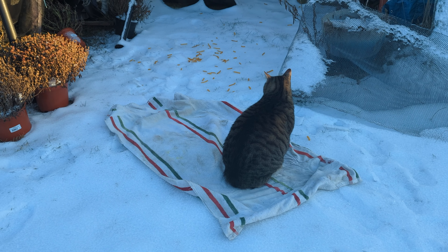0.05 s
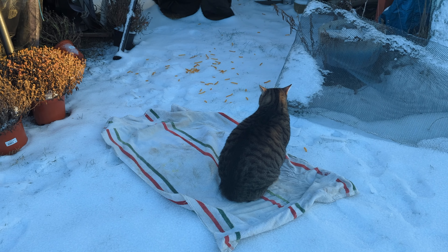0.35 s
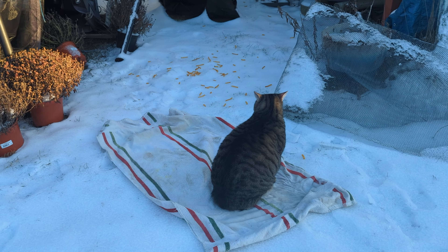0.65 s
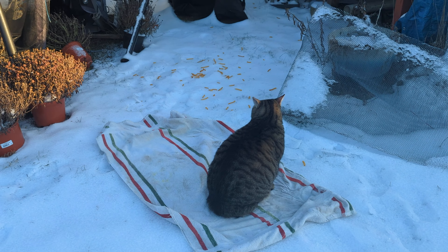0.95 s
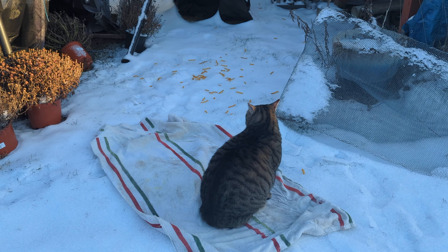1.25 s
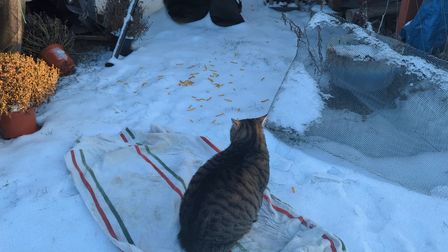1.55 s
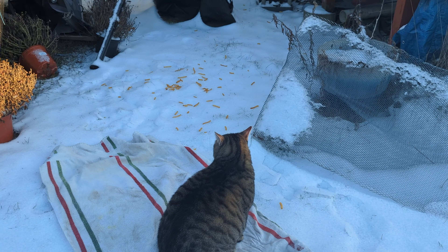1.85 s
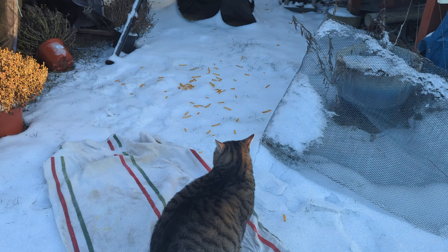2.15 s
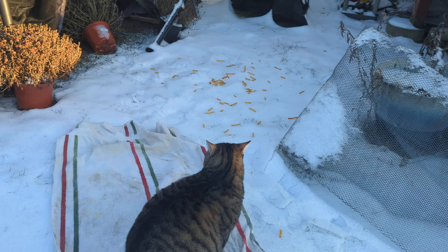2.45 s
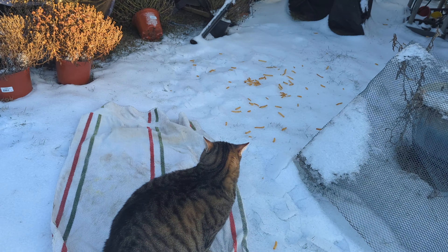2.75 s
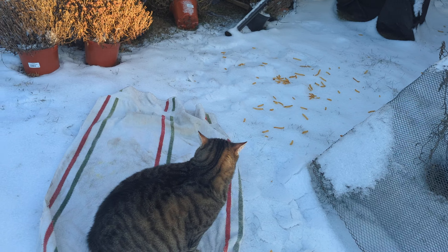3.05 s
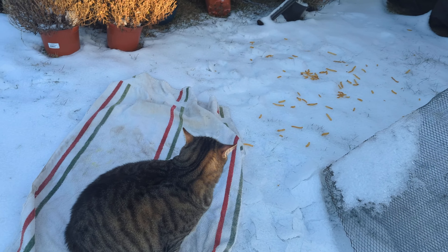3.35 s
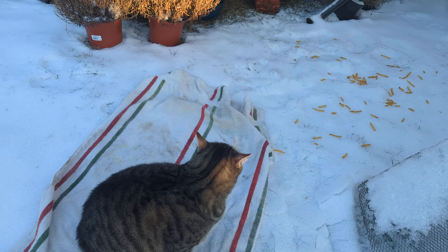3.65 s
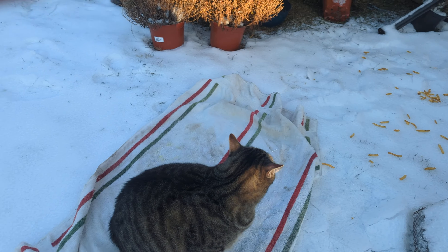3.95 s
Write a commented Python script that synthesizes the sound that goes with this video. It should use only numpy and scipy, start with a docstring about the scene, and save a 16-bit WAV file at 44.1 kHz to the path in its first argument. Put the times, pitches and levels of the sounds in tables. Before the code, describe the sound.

Footsteps press slowly into frozen snow outdoors, each a gritty crunch with small brittle cracks and a few soft thuds. The walker's handheld phone also picks up a faint low rumble and, at the end, a brush of fabric.

```python
"""Slow steps on crusted snow in a yard, heard from a phone in the walker's hand.
A low rumble, faint outdoor air and a soft rustle are there from the start. Loose grains trickle, the icy
crust snaps in single brittle fractures, the sole thuds, and early on the phone jolts in the hand.
As the weight comes down, the snow beneath crunches: many tiny grains break in jerks.
Near the end the rustle of clothing swells and the fabric gives a brighter brush."""
import sys
import numpy as np
from scipy import signal
from scipy.fft import rfft, irfft
from scipy.io import wavfile
from scipy.ndimage import map_coordinates

SR = 44100
rng = np.random.default_rng(int(sys.argv[2]) if len(sys.argv) > 2 else 0)


def pcm_store(signal):
    """Save signal as 16-bit PCM."""
    levels = np.round(np.clip(np.atleast_2d(signal), -1, 1) * 32767)
    wavfile.write(sys.argv[1], SR, levels.astype(np.int16).T)


N = 176400


def undb(db):
    """Amplitude ratio: tenfold for every 20 dB."""
    return 10 ** (np.asarray(db) / 20)


def envelope(rows):
    """Linear interpolation of a level in dB over time, silent outside the rows."""
    times, db = np.array(rows).T
    return np.interp(np.arange(N) / SR, times, db, left=-120, right=-120)


def unit(x):
    """Normalisation to rms 1."""
    return x / np.sqrt(np.mean(x ** 2))


def spectrum_db(points, hz):
    """Interpolation of a spectrum on a log-frequency axis."""
    f, db = np.array(points).T
    return np.interp(np.log(hz + 1), np.log(f), db)


def colour(x, points):
    """Minimum-phase filtering: folding the cepstrum makes the given spectrum causal."""
    n = len(x)
    gain = undb(spectrum_db(points, np.fft.rfftfreq(n, 1 / SR)))
    cepstrum = irfft(np.log(gain), n)
    cepstrum[1:n // 2] *= 2
    cepstrum[n // 2 + 1:] = 0
    return irfft(rfft(x) * np.exp(rfft(cepstrum)), n)


def noise(points):
    """Spectrally shaped Gaussian noise of rms 1."""
    return unit(colour(rng.standard_normal(N), points))


def wander(hz):
    """Random modulation: straight lines between Gaussian values, spread near 1."""
    return 1.2 * np.interp(np.arange(N) * hz / SR, np.arange(N), rng.standard_normal(N))


def grains(per_s, spread_db):
    """Poisson impulses: a few stand out as stronger, or as weaker if the spread is negative."""
    size = undb(spread_db * np.minimum(rng.exponential(size=N), 4))
    occurs = rng.random(N) < per_s / SR
    return unit(occurs * size * rng.choice([-1, 1], N))


def add(track, start_s, sound):
    """Superposition of a short sound on a track."""
    i = max(int(start_s * SR), 0)
    track[i:i + len(sound)] += sound[:max(N - i, 0)]


# Spectra of the rumble and the outdoor air. Each row: frequency in Hz, relative density in dB.
RUMBLE_SPECTRUM = [(12, -8), (22, 1), (48, -6), (60, -6.5), (71, -4), (90, -14), (130, -27), (220, -47),
                   (600, -74.5)]
AIR_SPECTRUM = [(130, -0.5), (300, -4.5), (700, -15), (1200, -40), (3000, -39), (9000, -52), (13000, -74)]
# Drift of the rumble. Each row: time in seconds, level in dB.
RUMBLE_ENVELOPE = [(0, -39.5), (1.8, -44), (3.3, -42), (4, -44.5)]
BUFFETING, AIR_DB = (1.6, 0.88), -56.5  # left and right port's own rumble, relative to the shared part


def background():
    """Partial coherence: both microphone ports share rumble and air, and each adds noise of its own."""
    shared, air = noise(RUMBLE_SPECTRUM), noise(AIR_SPECTRUM)
    rumble = np.array([unit(shared + own * noise(RUMBLE_SPECTRUM)) * (1 + own) for own in BUFFETING])
    rumble *= undb(envelope(RUMBLE_ENVELOPE)) / (1 + np.mean(BUFFETING))
    outdoors = np.array([air + 0.17 * noise(AIR_SPECTRUM) for _ in range(2)])
    return rumble + undb(AIR_DB) * outdoors


# Swell of the dull rustle. Each row: time in seconds, level in dB.
RUSTLE_ENVELOPE = [(0, -68.5), (1, -67), (2.1, -67.5), (2.9, -72), (3.4, -61.5), (3.75, -56), (4, -51.5)]
# Its spectrum. Each row: frequency in Hz, relative density in dB.
RUSTLE_SPECTRUM = [(300, 0), (900, -2), (1500, -9.5), (4500, -22), (16000, -70)]


def clothing_rustle():
    """Friction noise: clothing rubs softly, with a fluttering level, as the walker turns."""
    flutter_db = 3.4 * wander(hz=84)
    return undb(envelope(RUSTLE_ENVELOPE) + flutter_db) * noise(RUSTLE_SPECTRUM)


# Flow of loose grains. Each row: time in seconds, level in dB.
TRICKLE_ENVELOPE = [(.2, -72.5), (.32, -58), (.39, -76), (1.08, -60), (1.17, -63.5), (1.22, -78),
                    (2.29, -77.5), (2.75, -67), (2.95, -70), (3.55, -58.5), (3.78, -77)]
# Its spectrum. Each row: frequency in Hz, relative density in dB.
TRICKLE_SPECTRUM = [(800, 10), (3000, -3.5), (5800, -5), (8300, 1.5), (11000, -9.5), (13000, -23),
                    (16000, -37.5)]


def trickle():
    """Shot noise: the tiny impacts of ice grains sliding and settling merge into a fine hiss."""
    impacts = grains(per_s=8400, spread_db=3.0)
    return undb(envelope(TRICKLE_ENVELOPE)) * unit(colour(impacts, TRICKLE_SPECTRUM))


# Fractures of the crust. Each row: start in seconds, relative level of body and plate in dB,
# pitch of the broken plate in Hz, relative level of the snap in dB.
CRUST_CRACKS = [(0.226, -27, 1570, -42), (0.422, -26.5, 730, -39.5), (0.497, -30, 784, -40),
                (0.545, -25.5, 667, -42.5), (0.562, -17.5, 590, -33), (0.638, -28, 1090, -52),
                (0.676, -31, 630, -41.5), (0.684, -34, 497, -42.5), (0.71, -26.5, 770, -42),
                (0.796, -17, 886, -37), (0.807, -21.5, 1020, -50), (0.897, -25.5, 950, -36.5),
                (1.035, -28, 1620, -48), (1.174, -31.5, 805, -48), (1.23, -42, 536, -56),
                (1.27, -36, 654, -48.5), (1.314, -36, 600, -38), (1.367, -38.5, 880, -47),
                (1.392, -20, 676, -30.5), (1.446, -14.5, 750, -23.5), (1.462, -12.5, 1570, -30),
                (1.4812, -19.5, 950, -29.5), (1.487, -20, 836, -31), (1.505, -15, 690, -25),
                (1.688, -29, 710, -42), (1.715, -29, 637, -42), (1.753, -32.5, 790, -45.5),
                (1.843, -42, 534, -58.5), (1.968, -41, 765, -56), (2.009, -40, 1900, -57),
                (2.039, -46.5, 835, -56.5), (2.137, -34.5, 600, -40.5), (2.302, -40, 925, -45),
                (2.355, -28.5, 1150, -38), (2.378, -35, 534, -30), (2.533, -25, 880, -39.5),
                (2.5946, -12.5, 920, -25.5), (2.598, -17.5, 940, -39), (2.659, -24, 920, -41),
                (2.697, -28, 1080, -63), (2.98, -30.5, 1540, -43), (3.083, -28, 1440, -34.5),
                (3.325, -31, 1560, -34), (3.488, -26.5, 1790, -40.5), (3.549, -45, 1040, -39.5),
                (3.881, -33, 1430, -32.5), (3.93, -27, 1480, -33), (3.967, -34, 1530, -38)]
# Spectra of the bright snap and the dull body. Each row: frequency in Hz, relative density in dB.
SNAP_SPECTRUM = [(500, -11), (1500, 1), (3300, 3.5), (6300, -0.5), (8200, 0.5), (11000, -11.5),
                 (16000, -28)]
BODY_SPECTRUM = [(80, -15), (220, -9), (500, 3.5), (1600, 3), (2600, -21), (6000, -41)]
SNAP_DB, BODY_DB, PLATE_DB = 1.5, -10.5, 2
CRACK_RISE_S, BODY_LAG_S, PLATE_DECAY_CYCLES = 0.00088, 0.000846, 1.5


def crust_cracks():
    """Brittle fracture: a bright snap, then a dull burst and the heavily damped knock of the plate."""
    out, t = np.zeros(N), np.arange(2048) / SR
    rise = np.minimum(t / CRACK_RISE_S, 1) ** 2

    def burst(spectrum, decay_s):
        """Exponentially decaying spiky noise, its energy proportional to the decay time."""
        fractures = rng.standard_normal(len(t)) * rng.random(len(t)) ** 2
        x = colour(fractures * rise * np.exp(-t / decay_s), spectrum)
        return x * np.sqrt(decay_s * SR / np.sum(x ** 2))

    for start, body_db, hz, snap_db in CRUST_CRACKS:
        snap = undb(SNAP_DB) * burst(SNAP_SPECTRUM, decay_s=0.0024)
        body = undb(BODY_DB) * burst(BODY_SPECTRUM, decay_s=0.0027)
        plate = rise * np.sin(2 * np.pi * hz * t) * np.exp(-t * hz / PLATE_DECAY_CYCLES)
        add(out, start, undb(snap_db) * snap)
        add(out, start + BODY_LAG_S, undb(body_db) * (body - undb(PLATE_DB) * plate))
    return out


# Landings of the sole. Each row: start in seconds, level in dB.
SOLE_THUDS = [(0.23, -31), (0.424, -38), (0.507, -33), (0.564, -24.5), (1.392, -34), (2.98, -34.5),
              (3.087, -29.5), (3.169, -32)]
THUD_HZ, THUD_DECAY_S = 301, 0.0025


def sole_thuds():
    """Damped oscillation: the sole strikes packed snow with a hollow thump, its pitch varying by chance."""
    out, t = np.zeros(N), np.arange(SR // 10) / SR
    for start, db in SOLE_THUDS:
        hz = THUD_HZ * np.exp(0.14 * rng.standard_normal())
        add(out, start, undb(db) * np.sin(2 * np.pi * hz * t) * np.exp(-t / THUD_DECAY_S))
    return out


# Jolts of the phone. Each row: start in seconds, peak of the envelope in dB.
HANDLING_BUMPS = [(0.242, -36), (.45, -34), (0.519, -38), (0.889, -35.5), (1.099, -32.5)]
BUMP_HZ, BUMP_LENGTH_S = 36.3, 0.094


def handling_bumps():
    """Structure-borne sound: each jolt in the hand gives the phone a few very low swings."""
    out, t = np.zeros(N), np.arange(int(BUMP_LENGTH_S * SR)) / SR
    for start, db in HANDLING_BUMPS:
        swing = np.sin(2 * np.pi * (BUMP_HZ * t + rng.random()))
        add(out, start, undb(db) * np.hanning(len(t)) * swing)
    return out


# Weight on the snow, one list per step. Each row: time in seconds, relative crunch level in dB.
STEP_LOADS = [
    [(.42, -49.5), (.46, -57.5), (.495, -52.5), (.508, -34.5), (.54, -52.5), (.57, -41), (.635, -47),
     (.67, -59), (.72, -53), (.785, -67)],
    [(.794, -62), (.803, -40), (.825, -57), (.87, -69), (.88, -36.5), (.903, -40), (.918, -49),
     (.995, -64.5), (1.035, -56), (1.07, -100)],
    [(1.32, -70), (1.44, -55), (1.456, -29), (1.475, -39), (1.503, -38), (1.511, -34.5), (1.54, -42),
     (1.57, -41), (1.645, -45), (1.657, -37.5), (1.678, -60.5), (1.695, -47.5), (1.78, -66)],
    [(2.34, -49), (2.372, -47.5), (2.4, -32.5), (2.44, -35), (2.48, -37), (2.55, -46), (2.62, -45.5),
     (2.685, -50.5), (2.73, -60.5)],
    [(2.98, -44.5), (3.02, -66.5), (3.045, -48), (3.075, -70), (3.09, -41.5), (3.155, -70)],
    [(3.16, -68), (3.172, -38), (3.185, -48), (3.225, -37), (3.31, -47.5), (3.425, -39.5), (3.48, -51.5),
     (3.54, -65), (3.56, -43), (3.58, -93)],
]
# Brightness of the steps. Each entry: one step's spectral tilt about 1 kHz in dB per octave.
STEP_TILTS = [-0.18, 0.68, 0.12, -0.29, 0.0099, -0.25]
# Spectrum of crunching snow. Each row: frequency in Hz, relative density in dB.
SNOW_SPECTRUM = [(100, -16), (250, -7.5), (430, -2.5), (660, 1.5), (1000, -2), (1700, -3.5), (3000, -9.5),
                 (8700, -11.5), (11000, -20), (16000, -42)]
SLIPS_PER_S, SLIP_DB, SLIP_DECAY_S = 260, -3.5, 0.00091
CRUNCH_DB = 2


def snow_crunch():
    """Stick-slip failure: grains break in jerks under the boot, small bright ones outnumbering large."""
    loads = [undb(envelope(step)) for step in STEP_LOADS]
    slips = np.abs(grains(SLIPS_PER_S, spread_db=-3.0))
    slips = unit(signal.lfilter([1], [1, -np.exp(-1 / (SLIP_DECAY_S * SR))], slips))
    jerks = unit(1 + undb(SLIP_DB) * slips)
    crunch = np.zeros(N)
    for hz in 125 * 2 ** np.arange(0, 7.5, .5):  # half-octave bands
        band = signal.butter(2, [hz / 2 ** .25, hz * 2 ** .25], "band", fs=SR, output="sos")
        weight = sum(load * undb(tilt * np.log2(hz / 1000)) for load, tilt in zip(loads, STEP_TILTS))
        fractures = grains(per_s=hz, spread_db=2.5)  # one grain per cycle on average
        crunch += signal.sosfilt(band, weight * jerks * fractures)
    power_gain = np.mean(undb(spectrum_db(SNOW_SPECTRUM, np.arange(SR / 2))) ** 2)
    return undb(CRUNCH_DB) * colour(crunch, SNOW_SPECTRUM) / np.sqrt(power_gain)


# The closing brush of fabric. Each row: time in seconds, level in dB.
BRUSH_ENVELOPE = [(3.815, -83), (3.83, -48), (3.865, -48), (3.9, -56.5), (3.95, -54), (4, -52)]
# Its spectrum. Each row: frequency in Hz, relative density in dB.
BRUSH_SPECTRUM = [(300, -35.5), (1200, 6), (2400, 6), (5000, -1.5), (8500, 5.5), (11000, -8.5),
                  (16000, -28)]


def clothing_brush():
    """Sliding friction: dense tiny impulses make one bright brush of fabric."""
    impulses = grains(per_s=8300, spread_db=2.5)
    return undb(envelope(BRUSH_ENVELOPE)) * unit(colour(impulses, BRUSH_SPECTRUM))


# Level difference between the ports. Each row: frequency in Hz, left minus right in dB.
PORT_DIFFERENCE = [(100, -4.5), (700, 0.5), (1300, -1.5), (2400, 0.7), (4400, -1.5), (8200, 4.5),
                   (13000, -1.5)]
TURN_S, LEFT_LAG_S = (2.0, 2.8), (45e-6, 12e-6)  # at the start and end of the phone's turn
SCATTER_DB, SCATTER_ABOVE_HZ = -1.5, 5470
YARD_DB, YARD_T60_S = -14, 0.072


def microphone_ports(x):
    """Path difference: the right port hears first; scattered treble and yard reverberation follow."""
    t, hz = np.arange(SR // 2) / SR, np.fft.rfftfreq(N, 1 / SR)
    treble = signal.sosfilt(signal.butter(1, SCATTER_ABOVE_HZ, "high", fs=SR, output="sos"), x)
    half_lag = SR * np.interp(np.arange(N) / SR, TURN_S, LEFT_LAG_S) / 2
    out = []
    for side in (1, -1):  # left, right
        direct = map_coordinates(x, [np.arange(N) - side * half_lag], mode="nearest")
        tail = rng.standard_normal(len(t)) * undb(-60 * t / YARD_T60_S)
        yard = undb(YARD_DB) * rfft(tail / np.sqrt(np.sum(tail ** 2)), N)
        # Treble from ever-changing spots takes four short paths of wandering strength.
        scatter = sum(np.roll(treble, lag) * wander(hz=699.3) for lag in rng.integers(2, 50, 4)) / 2
        heard = rfft(direct + undb(SCATTER_DB) * scatter) + rfft(x) * yard
        balance = undb(side * spectrum_db(PORT_DIFFERENCE, hz) / 2)
        out.append(irfft(heard * balance, N))
    return np.array(out)


def scene():
    """Superposition: airborne steps and clothing add to the handling bumps and the background."""
    steps = crust_cracks() + sole_thuds() + snow_crunch() + trickle()
    clothing = clothing_brush() + clothing_rustle()
    return microphone_ports(steps + clothing) + handling_bumps() + background()


CUTOFF_HZ = 15900


def record(dry):
    """Band limiting: the phone's steep low-pass filter cuts the top of the treble."""
    return signal.sosfilt(signal.ellip(10, .2, 80, CUTOFF_HZ, fs=SR, output="sos"), dry)


dry = scene()
out = record(dry)
pcm_store(out)
```